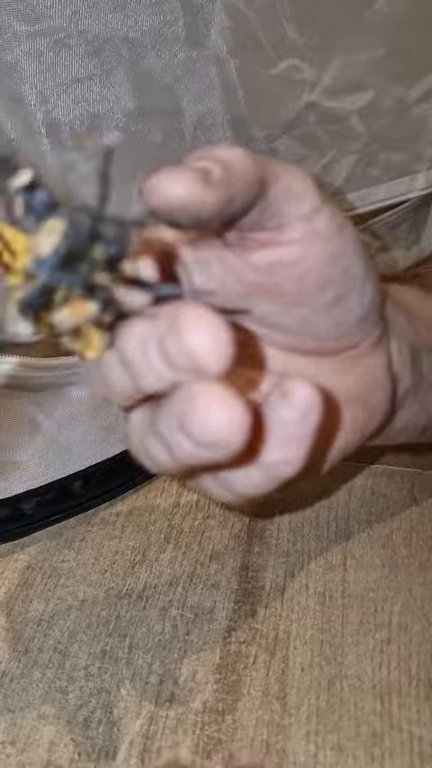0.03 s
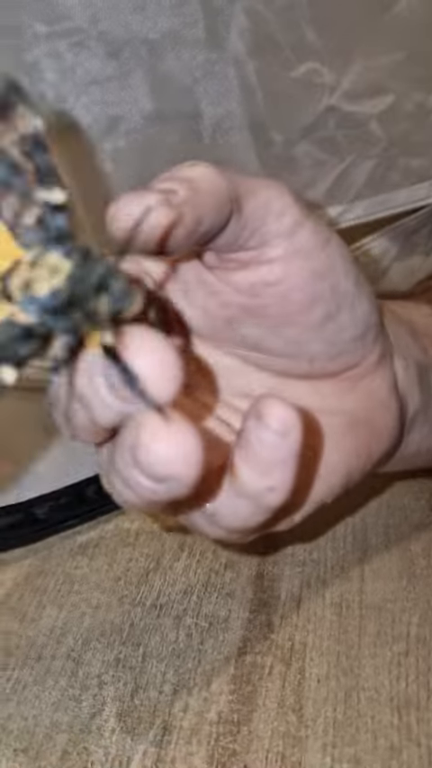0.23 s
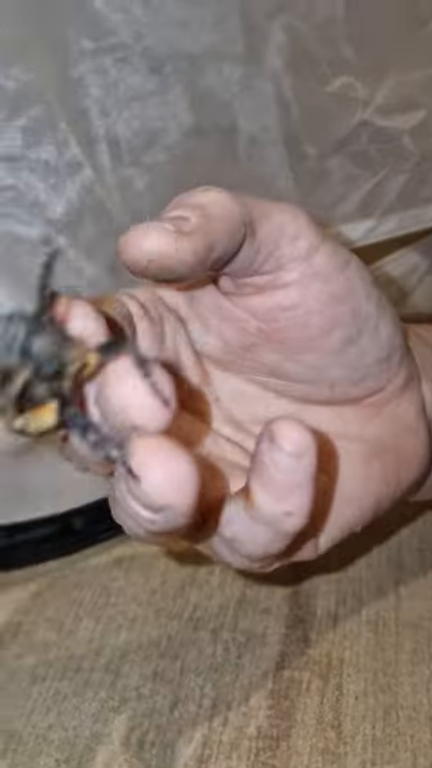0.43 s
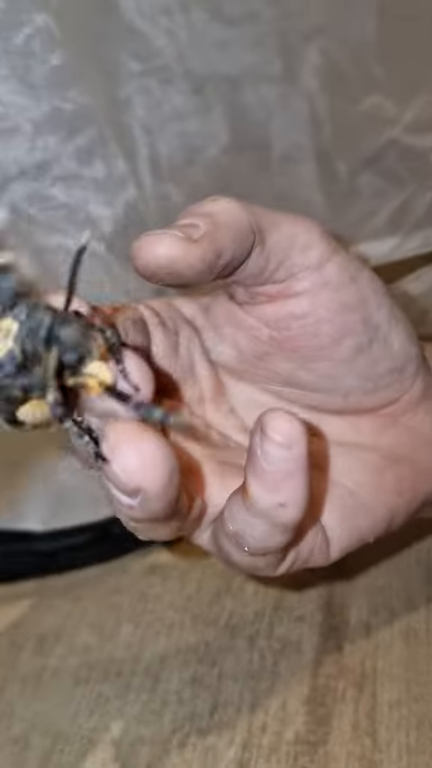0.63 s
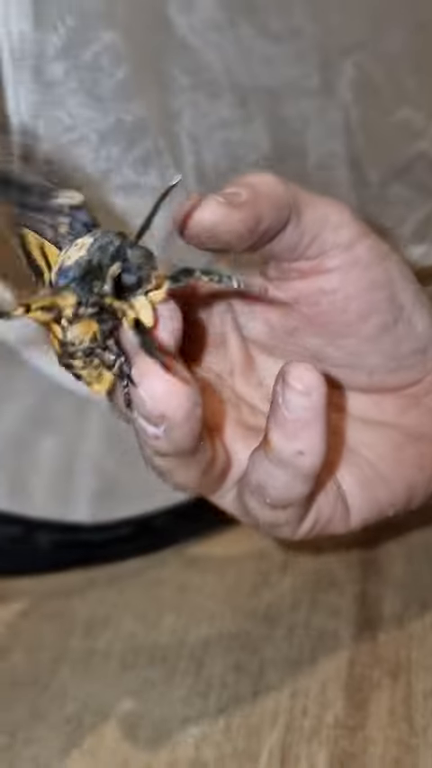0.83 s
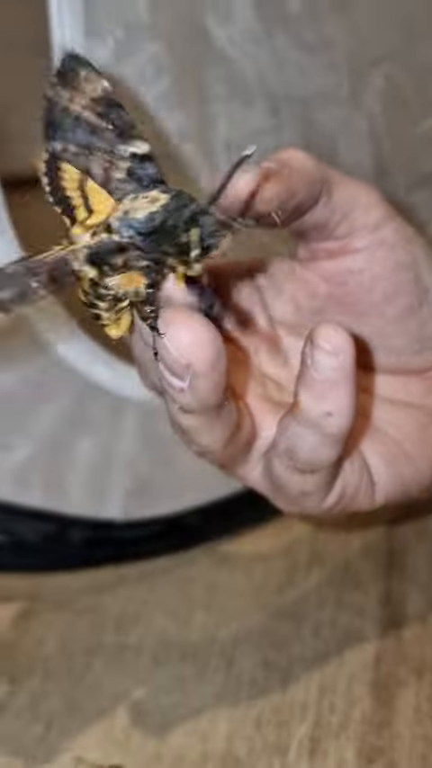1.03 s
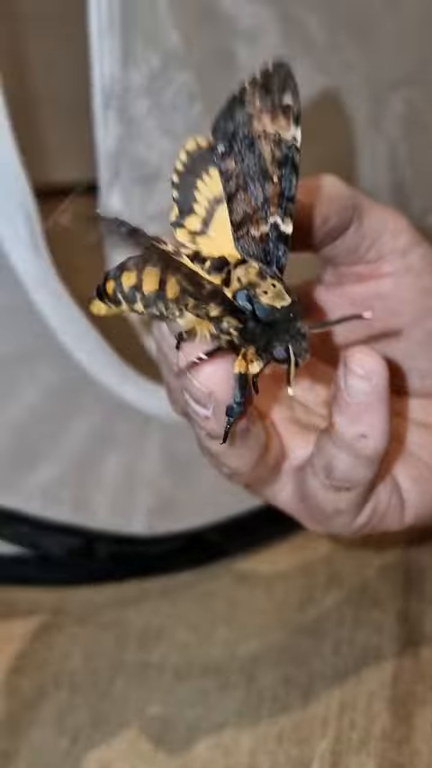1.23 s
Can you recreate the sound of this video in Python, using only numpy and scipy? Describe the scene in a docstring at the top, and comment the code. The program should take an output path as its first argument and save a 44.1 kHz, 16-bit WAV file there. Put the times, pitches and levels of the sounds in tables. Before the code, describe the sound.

A moth squeaks in short, raspy, high-pitched bursts close up in a small quiet room.

```python
"""A hawkmoth held in the hand squeaks close to the microphone in a small quiet room.
After a moment of silence, room rumble and the low hum of shivering wings set in. The moth sucks air
past a flap in its throat, which rattles in a slowing run of tiny rising chirps, then blows the air
out in a thin falling whistle. The breaths repeat over soft handling bumps and break into short
stutters. A faint knock follows, then a few last squeaks and a final bump."""
import sys
import numpy as np
from scipy import signal
from scipy.fft import rfft, irfft
from scipy.io import wavfile

SR = 44100
rng = np.random.default_rng(int(sys.argv[2]) if len(sys.argv) > 2 else 0)


def inscribe(sig):
    """Save sig as 16-bit PCM at rate SR to the path in sys.argv[1].

    A 1-D sig is mono; a 2-D sig holds one channel per row.
    Samples are clipped to [-1, 1] before scaling.
    """
    pcm = np.round(np.clip(np.atleast_2d(sig).T, -1, 1) * 32767)
    wavfile.write(sys.argv[1], SR, pcm.astype(np.int16))


N = 114660
T = np.arange(N) / SR
HZ = np.maximum(np.arange(N // 2 + 1) * SR / N, 1)


def from_db(db):
    """Decibels to gain."""
    return 10 ** (np.asarray(db) / 20)


def unit_rms(x):
    """Scale to an rms of 1."""
    return x / np.sqrt(np.mean(x ** 2) + 1e-20)


def over_hz(points):
    """Draw a curve through the points on a log frequency axis."""
    hz, value = np.transpose(points)
    return np.interp(np.log(HZ), np.log(hz), value)


def drift(hz):
    """Random wander of rms 1, mostly slower than hz."""
    return unit_rms(signal.sosfilt(signal.butter(2, hz, fs=SR, output="sos"), rng.standard_normal(N)))


def band_noise(low_hz, high_hz, order):
    """Band-passed noise of rms 1."""
    band = signal.butter(order, [low_hz, high_hz], "band", fs=SR, output="sos")
    return unit_rms(signal.sosfilt(band, rng.standard_normal(N)))


def delayed(x, ms):
    """Delay a sound, to a fraction of a sample."""
    size = 2 * len(x)
    hz = np.arange(len(x) + 1) * SR / size
    return irfft(rfft(x, size) * np.exp(-2j * np.pi * hz * ms / 1000))[:len(x)]


def add(out, start, x):
    """Mix a sound in at a start time in seconds."""
    i = max(int(start * SR), 0)
    out[..., i:i + x.shape[-1]] += x[..., :max(out.shape[-1] - i, 0)]


# The rumble's EQ. Each row: frequency in Hz, relative level in dB.
RUMBLE_EQ = [(15, -52), (25, 1), (196, -4.5), (543, -18), (1000, -25), (1210, -24.5), (1460, -28.5),
             (1810, -31), (3540, -23.5), (5010, -25.5), (7480, -19.5), (9770, -31), (15000, -30)]
# Its stereo image. Each row: frequency in Hz, left-right likeness from 0 (wide) to 1 (mono).
RUMBLE_LIKENESS = [(40, 0.6), (150, 0.89), (300, 0.34), (600, 0.054), (8000, 0.035)]


def room_rumble():
    """A steady bed of room noise, centred in the bass and wide above."""
    mid, side = rfft(rng.standard_normal((2, N)))
    alike = over_hz(RUMBLE_LIKENESS)
    stereo = np.sqrt(1 + alike) * mid + np.sqrt(1 - alike) * side * np.array([[1], [-1]])
    return from_db(-64) * unit_rms(irfft(stereo * from_db(over_hz(RUMBLE_EQ)), N))


def room_drone(hz=299.5, db=-79.5):
    """A faint drone that comes and goes within the rumble."""
    return from_db(db) * np.sqrt(2) * drift(8.8) * np.sin(2 * np.pi * hz * T)


# The wing hum's slow build. Each row: time in seconds, level in dB.
HUM_BUILD = [(.2, -74.5), (.9, -69.5), (1.5, -68), (2.6, -66.5)]


def wing_hum(hz=48.5, waver=0.14):
    """The shivering wings give a low, slightly unsteady tone."""
    level = from_db(np.interp(T, *np.transpose(HUM_BUILD))) * (1 + waver * drift(3.2))
    return np.sqrt(2) * level * np.sin(2 * np.pi * hz * T)


def chirp(from_hz, to_hz, length_ms, overtone_db, hiss_db, noise):
    """One opening of the flap: a tiny gliding tone with overtone and hiss."""
    progress = np.minimum(T[:len(noise)] * 1000 / length_ms, 1)
    detune, gain = 1 + .02 * noise[0], from_db(.6 * noise[-1])   # no two chirps quite alike
    hz = (from_hz + (to_hz - from_hz) * progress ** 0.69) * detune
    phase = 2 * np.pi * np.cumsum(hz) / SR
    tone = np.sin(phase) + from_db(overtone_db) * np.sin(2 * phase) + from_db(hiss_db) * noise
    return gain * np.sin(np.pi * progress) ** 0.98 * tone


def with_hand_echo(x, pan_db, echo_ms, left_bounce=0.1, right_bounce=0.73):
    """Direct sound plus its bounce off the cupped hand; the right side arrives a touch late."""
    echo = delayed(x, echo_ms)
    makeup = np.hypot(1, right_bounce) / np.hypot(1, left_bounce)   # offsets the weaker left bounce
    left = from_db(pan_db / 2) * makeup * (x + left_bounce * echo)
    right = from_db(-pan_db / 2) * delayed(x + right_bounce * echo, ms=0.2223)
    return np.array([left, right]) / 2


# The in-breaths. Each row: start and end in seconds, first and last rate in chirps per second,
# level in dB, swell in seconds, pan in dB (left minus right), hand echo in ms, chirp top in Hz,
# hiss in dB against the tone.
INTAKE_RASPS = [(.199, 0.3152, 690, 75, -23, 0.057, -6.5, 0.5, 9340, -16),
                (0.433, 0.56, 660, 70, -21.5, 0.032, -7, 0.4987, 9520, -16.5),
                (0.671, 0.7817, 600, 65, -21.5, .02, -6, .53, 9030, -14),
                (0.789, 0.798, 200, 200, -36, .001, -12, .53, 9800, -14),
                (0.908, 1, 600, 150, -22, 0.037, -5.5, 0.55, 8900, -17),
                (1.01, 1.028, 235, 190, -24.5, .001, -5, .53, 9300, -16.5),
                (1.134, 1.2145, 570, 160, -25, .012, -3.5, .53, 9260, -17.5),
                (1.2273, 1.259, 320, 170, -25, .001, -3, 0.54, 8600, -11.5),
                (1.2789, 1.279, 200, 200, -27.5, 0.00086, -7, .53, 9100, -12),
                (1.424, 1.4818, 510, 180, -29.5, 0.0096, -5.5, .53, 9560, -12),
                (1.492, 1.501, 190, 140, -30.5, .001, 0, .53, 9600, -17.5),
                (1.567, 1.5834, 780, 320, -30.5, .001, -3.5, .6, 10040, -11.5),
                (1.6528, 1.667, 450, 270, -28.5, .001, -4.5, 0.677, 10150, -11.5),
                (1.7096, 1.714, 250, 250, -27.5, .001, -5.5, .65, 10100, -16),
                (1.7591, 1.773, 350, 300, -28, .001, -4.5, 0.675, 9900, -9),
                (2.153, 2.189, 590, 200, -33.5, .03, -8.5, .5, 9700, -10),
                (2.193, 2.2643, 590, 210, -23.5, 0.013, -9, .5, 9300, -11),
                (2.2726, 2.279, 81, 220, -27, .001, -11.5, .5, 9500, -7.5),
                (2.459, 2.483, 490, 250, -39, .004, -7, .53, 9300, -10),
                (2.486, 2.4825, 200, 200, -45, 0.00073, -7, 0.64, 9800, -19),
                (2.4965, 2.5065, 375, 280, -36, .001, -8.5, .53, 9240, -20)]


def intake_rasps():
    """Indrawn air rattles the flap in runs of rising chirps; most slow down as the throat fills."""
    out = np.zeros((2, N))
    progress = np.linspace(0, 1, 200)
    for start, end, first_rate, last_rate, db, swell, pan_db, echo_ms, top_hz, hiss_db in INTAKE_RASPS:
        length = abs(end - start)
        noises = rng.standard_normal((100, 160))   # one strip per chirp
        wander = 1 + .02 * np.interp(progress, np.linspace(0, 1, 7), rng.standard_normal(7))
        rate = wander * (last_rate + (first_rate - last_rate) * np.sqrt(1 - progress))
        cycles = np.cumsum(rate) * length / len(progress)
        openings = np.linspace(0, cycles[-1], round(cycles[-1]) + 1)   # one per flap cycle
        run = np.zeros(SR // 5)
        for t, noise in zip(np.interp(openings, cycles, progress * length), noises):
            strength = min(.08 + (t + .5 / first_rate) / swell, 1)
            jitter = .015 * noise[-2] / first_rate
            pulse = chirp(2710, top_hz, length_ms=0.885, overtone_db=-8, hiss_db=hiss_db, noise=noise)
            add(run, t + jitter, strength * pulse)
        add(out, start, from_db(db) * with_hand_echo(run, pan_db, echo_ms))
    return out


# The hand's movements. Each row: start in seconds, length in seconds, rough pitch in Hz, level in dB.
HAND_BUMPS = [(0.287, .14, 44, -58), (0.433, 0.082, 95, -59), (0.657, 0.19, 169, -69.5),
              (1.952, .11, 116, -57), (2.561, 0.043, 113, -52.5)]


def handling_bumps():
    """The moving hand makes dull, soft swells of low noise."""
    out = np.zeros(N)
    for start, length, hz, db in HAND_BUMPS:
        swell = np.sin(np.pi * np.clip((T - start) / length, 0, 1))
        out += from_db(db) * swell * band_noise(hz / 2.7, hz * 1.35, order=2)
    return out


# The edges of the out-breaths. Each row: start in seconds, level in dB, centre pitch in Hz, length in ms.
BREATH_PIPS = [(0.3512, -28.5, 8600, 3.4), (.404, -39, 8400, 5.3), (0.412, -38, 7800, 3.4),
               (.602, -25, 6800, 1.4), (0.8223, -30, 7760, 1.45), (.8235, -28, 8340, 1.57),
               (1.0648, -30.5, 7400, 2.4), (1.1107, -36.5, 8030, 4.9), (1.3158, -36, 7200, 1.5),
               (1.9642, -33.5, 6920, 4.7), (1.9705, -32.5, 8200, 2.4), (2.3145, -28.5, 7300, 2.2)]


def breath_pips(fall=0.55):
    """Falling pips as the outward air starts or stops."""
    out = np.zeros((2, N))
    for start, db, hz, ms in BREATH_PIPS:
        from_hz, to_hz = hz * (1 + fall / 2), hz * (1 - fall / 2)
        pip = chirp(from_hz, to_hz, ms, overtone_db=-16, hiss_db=-16, noise=rng.standard_normal(400))
        add(out, start, from_db(db) * with_hand_echo(pip, pan_db=-2.5, echo_ms=0.506))
    return out


# The out-breaths. Each row: start in seconds, length in seconds, top pitch in Hz, level in dB,
# swell in seconds, pan in dB (left minus right), waver as a share of the pitch.
OUTWARD_WHISTLES = [(0.352, 0.061, 7006, -40, 0.032, -9.5, 0.0072),
                    (0.601, 0.065, 6700, -40, 0.00093, -8.5, 0.0075),
                    (1.064, 0.059, 6260, -44, .002, -7, 0.0068),
                    (1.314, 0.055, 7060, -42.5, 0.00084, -4.5, 0.0088),
                    (1.973, 0.035, 6390, -47, 0.0018, -9, 0.0475),
                    (2.319, 0.046, 6890, -44, .002, -9.5, 0.025)]
# Every whistle's arc. Each row: share of the length, share of the top pitch, fundamental's gain in dB.
WHISTLE_ARC = [(0, 0.93, -1), (.24, 1.0, -7.5), (0.449, 0.96, -9.5), (0.618, .925, 1.5), (0.759, .82, -3.5),
               (0.882, 0.58, -15), (1, 0.6, -64)]


def outward_whistles(overtones_db=-15, air_db=-19.5, flutter_db=1.6, release_s=0.0017):
    """Air blown out: a wavering tone that arches and drops as the pressure runs out."""
    out = np.zeros((2, N))
    share, arc_pitch, arc_db = np.transpose(WHISTLE_ARC)
    for start, length, top_hz, db, swell, pan_db, waver in OUTWARD_WHISTLES:
        t = T[T < length]
        progress = t / length
        hz = top_hz * np.interp(progress, share, arc_pitch) * (1 + waver * drift(394)[:len(t)])
        phase = 2 * np.pi * np.cumsum(hz) / SR
        fundamental = from_db(np.interp(progress, share, arc_db)) * np.sin(phase)
        overtones = from_db(overtones_db) * (np.sin(2 * phase) + np.sin(3 * phase))
        air = from_db(air_db) * band_noise(5500, 9000, order=1)[:len(t)] * (.5 + progress)
        level = from_db(db + flutter_db * drift(180)[:len(t)])
        fades = np.minimum(t / swell, 1) * np.minimum((length - t) / release_s, 1)
        pan = from_db([[pan_db / 2], [-pan_db / 2]])
        add(out, start, pan * level * fades * (fundamental + overtones + air))
    return out


def head_cavity(x, hz=7770, width_hz=1200, gain=0.21):
    """The head cavity rings briefly after each pulse, giving the squeak its piercing centre."""
    b, a = signal.iirpeak(hz, hz / width_hz, fs=SR)
    ring = signal.lfilter(b, a, x + 1e-18)
    return (x + gain * ring) / (1 + gain / 2)


# The throat's colour. Each row: frequency in Hz, gain in dB.
THROAT_EQ = [(300, -11), (1100, -16), (2200, -4.5), (2900, -6), (3400, 0), (3900, -3), (4900, 0),
             (5800, -1.5), (6800, 6.5), (7600, 7.5), (8600, 3.5), (10200, 1), (11700, 2.5), (13000, -6.5),
             (14700, 3), (15600, -2)]
# Extra colour on the left side. Each row: frequency in Hz, gain in dB.
LEFT_EQ = [(2000, 4.5), (4000, 0), (7500, -2), (9500, 0), (12500, 5.5), (15000, 4)]


def throat_colour(x):
    """The throat shapes the squeak's tone; the left side gets more mids and top."""
    eq_db = over_hz(THROAT_EQ) + np.outer([1, 0], over_hz(LEFT_EQ))
    return irfft(rfft(x) * from_db(eq_db), N)


def reflections(x, db, t60_s):
    """Diffuse echoes that die away, different on each side."""
    t = T[:SR // 2]
    tail = rng.standard_normal((2, len(t))) * from_db(-60 * t / t60_s) * (t > .001)
    tail /= np.sqrt(np.sum(tail ** 2, axis=1, keepdims=True))
    return from_db(db) * signal.fftconvolve(x, tail, axes=1)[:, :N]


# The knock's partials. Each row: pitch in Hz, level in dB.
KNOCK_PARTIALS = [(1000, -65), (1410, -60.5), (1530, -60)]


def knock(start=1.838, attack_s=0.0053, t60_s=0.062):
    """One faint, soft-edged knock that rings out quickly."""
    out = np.zeros(N)
    envelope = np.minimum(T / attack_s, 1) * from_db(-60 * T / t60_s)
    for hz, db in KNOCK_PARTIALS:
        add(out, start, from_db(db) * envelope * np.sin(2 * np.pi * hz * T))
    return out


def scene():
    """The squeaking moth up front, with a small room and quiet low sounds behind it."""
    moth = throat_colour(head_cavity(intake_rasps() + breath_pips() + outward_whistles()))
    near = reflections(moth, db=-11, t60_s=.02)
    crossfed = moth + moth[::-1] / 2   # each side spills into the other
    room = reflections(crossfed, db=-11.5, t60_s=0.24)
    return moth + near + room + room_rumble() + room_drone() + wing_hum() + handling_bumps() + knock()


def record(dry, silence_s=0.1846, cutoff_hz=15400):
    """Sound sets in after a moment of silence; the top is cut steeply."""
    fade_in = np.clip((T - silence_s) / 0.0022, 0, 1)
    return signal.sosfilt(signal.ellip(10, .1, 80, cutoff_hz, fs=SR, output="sos"), dry * fade_in)


dry = scene()
out = record(dry)
inscribe(out)
```